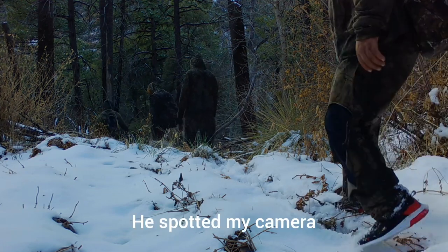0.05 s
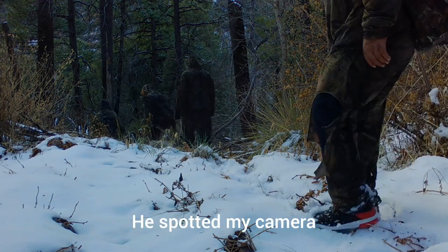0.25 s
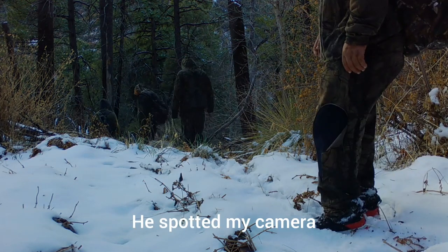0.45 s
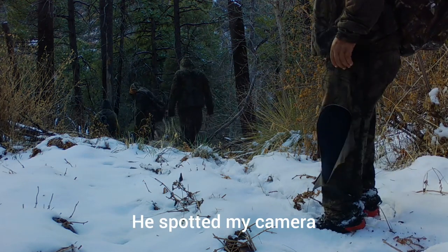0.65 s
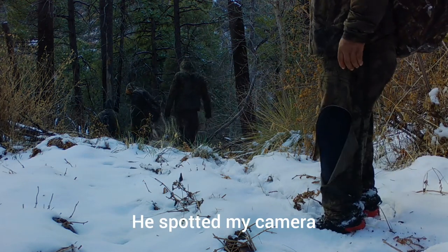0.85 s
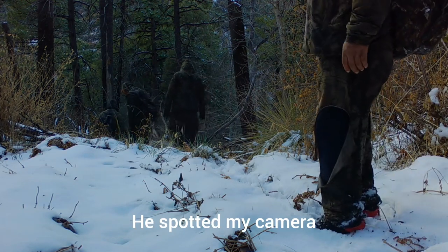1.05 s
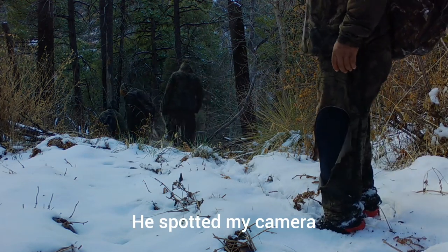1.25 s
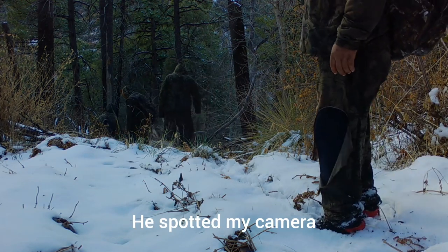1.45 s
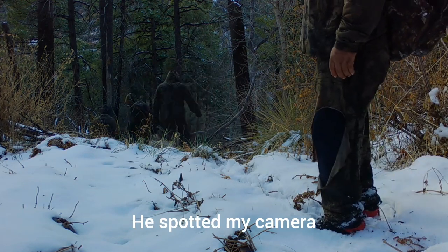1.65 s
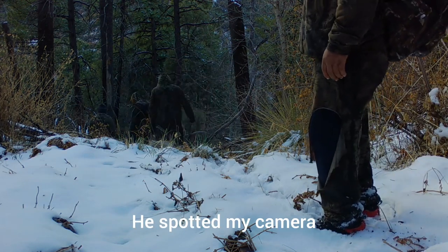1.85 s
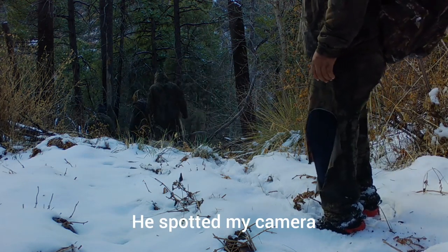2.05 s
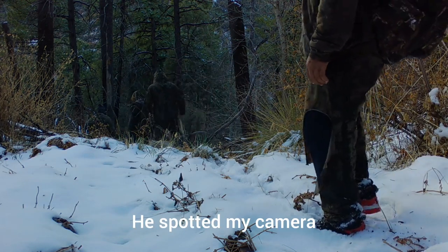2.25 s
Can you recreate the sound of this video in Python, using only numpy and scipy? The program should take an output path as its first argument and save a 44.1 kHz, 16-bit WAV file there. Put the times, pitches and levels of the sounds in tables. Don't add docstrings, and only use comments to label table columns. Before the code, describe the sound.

Boots crunch through crusty snow in a forest, a twig snaps sharply, then dry brush crackles

```python
import sys
import numpy as np
from scipy import signal
from scipy.io import wavfile
from scipy.ndimage import uniform_filter1d

SR = 44100
rng = np.random.default_rng(int(sys.argv[2]) if len(sys.argv) > 2 else 0)


def pcm_store(signal):
    levels = np.round(np.clip(np.atleast_2d(signal), -1, 1) * 32767)
    wavfile.write(sys.argv[1], SR, levels.astype(np.int16).T)


def how_loud(loudness_db):
    steps = np.asarray(loudness_db, float) / 20
    return 10 ** steps


N = 101429
T = np.arange(N) / SR

# start_s, level_db
WIND_GUSTS = [(0.0, -41), (0.03, -47.5), (0.13, -59), (0.17, -45.5), (0.34, -58), (0.37, -43),
              (0.63, -65.5), (0.78, -41), (0.84, -55), (0.9, -40.5), (0.97, -58.5), (1.29, -48.5),
              (1.43, -61.5), (1.8, -57.5), (1.82, -49), (2.0, -58.5), (2.07, -54.5), (2.3, -55.5)]
# pitch_hz, density_db (per Hz)
WIND_SPECTRUM = [(13, -37.5), (22, 1), (43, 0), (129, -21.5), (150, -36), (250, -26.5), (320, -70),
                 (550, -120)]
# start_s, level_db
FAR_STEPS = [(0, -56.5), (.1, -56), (.35, -51.5), (.55, -55), (.9, -52), (1.17, -54.5), (1.6, -52),
             (2.0, -51.5), (2.17, -53.5), (2.3, -57.5)]
# pitch_hz, density_db (per Hz)
WOODS_SPECTRUM = [(35, -29), (60, -2), (197, -5.5), (261, -14), (361, -8.5), (2620, -16), (6360, -8),
                  (14400, -28), (15800, -37)]
# pitch_hz, level_db, t60_s
TWIG_MODES = [(1050, -28, .006), (2400, -20, .004), (3200, -19, .004), (4300, -9, .003), (4900, -14, .017),
              (6120, 4, .0055), (7300, -7, .003), (8500, -4, .003), (10000, -9, .003), (12400, -12, .0025)]
# start_s, peak_db, pitch_hz
STALK_TICKS = [(.0058, -29, 6640), (0.0234, -33, 5900), (0.049, -34, 6700), (0.079, -38, 6300),
               (.175, -28, 6800), (.178, -28, 6500), (0.4997, -33, 6240), (0.8327, -31.5, 4100),
               (1.6243, -34, 6940), (1.7688, -36, 5500), (1.747, -37, 5800), (1.793, -26.5, 6000),
               (1.8395, -35, 8900), (1.877, -38, 6500), (1.983, -45, 3000), (0.923, -36, 6200),
               (1.044, -42, 5650), (1.1323, -40, 6300), (1.8971, -28, 6500), (1.9232, -34, 10700),
               (1.938, -42, 6200), (1.962, -42, 3300), (1.9941, -26.5, 3080), (2.079, -34, 6200),
               (1.9927, -35, 5860), (1.9947, -38, 4500), (2.007, -38, 8500), (2.052, -35, 8500),
               (1.817, -34, 11000), (2.047, -42, 2700), (2.1394, -51, 4000)]
# start_s, level_db
LEG_DRAG = [
    (1.17, -63),
    (1.212, -56),
    (1.316, -42.5),
    (1.434, -32),
    (1.658, -36.5),
    (1.78, -43.5),
    (1.88, -51.5),
    (1.964, -50.5),
    (1.974, -62),
    (2.03, -63),
]
# centre_s, lift_db, half_width_s
STALK_SURGES = [(1.409, 5, 0.0016), (1.417, 4.5, .0015), (1.438, 4, 0.0018), (1.439, -5, .001),
                (1.456, 1.5, 0.0036), (1.465, 2, .0015), (1.481, -2, .0015), (1.488, 3.5, .0015),
                (1.5, 3.5, 0.0037), (1.519, 0.5, 0.0023), (1.525, 8, 0.0031), (1.939, 7, .003),
                (1.534, 4.5, 0.0037), (1.625, 2.5, .006), (1.663, 1.5, 0.011), (1.72, 1.5, 0.0072),
                (1.956, 8, 0.0074)]
# pitch_hz, density_db (per Hz)
BRUSH_SPECTRUM = [(400, -23.5), (1200, -21.5), (2600, -18), (3400, -11.5), (5000, -7.5), (6100, -0.5),
                  (9500, -7), (15800, -20.5)]
# start_s, peak_db, pitch_hz
HEEL_THUDS = [
    (0.034, -58, 95),
    (0.178, -50, 154),
    (0.581, -46.5, 114),
    (0.723, -44.5, 191),
    (1.208, -48.5, 120),
    (1.416, -51, 160),
    (1.588, -46, 110),
    (2.023, -50, 134),
    (2.103, -40, 91),
]
# start_s, peak_db, pitch_hz, cycles_to_die
CRUST_KNOCKS = [(0.0407, -35.5, 850, 8.6), (0.185, -33.5, 560, 4.2), (0.2603, -40.5, 700, 3.7),
                (0.2595, -40.5, 1500, 4.5), (.41, -44, 500, 3.8), (.432, -43.5, 480, 4.3),
                (0.5, -45, 810, 6), (.513, -42, 620, 2.1), (.583, -46, 393, 6.3), (.727, -35.5, 756, 3.5),
                (.7284, -30, 674, 4.5), (.7298, -37, 513, 4.2), (0.728, -41, 1600, 10),
                (.7275, -46, 2140, 10), (0.922, -43, 1090, 16), (1.1139, -37, 790, 2.6),
                (1.131, -38, 1490, 2.6), (1.212, -35, 1800, 9.2), (1.538, -40, 1200, 15),
                (1.531, -44.5, 516, 10), (1.519, -43, 2100, 12), (1.559, -44, 1010, 18),
                (1.565, -44, 443, 3.7), (1.648, -44, 1290, 14), (1.66, -43, 1270, 19),
                (1.612, -36, 3500, 8), (1.6725, -36, 1150, 5.5), (1.674, -33, 2900, 7.6),
                (1.688, -26.5, 1180, 4.4), (1.687, -31, 3050, 7.9), (1.6892, -39, 774, 6.1),
                (1.705, -44, 2900, 7), (1.786, -41, 855, 5.2), (1.841, -39, 400, 9.7),
                (2.073, -40.5, 1140, 7.1), (2.0946, -36.5, 895, 5.6), (2.093, -44, 3000, 8),
                (2.099, -42, 1300, 5), (2.096, -43.5, 266, 5.2)]
# start_s, length_s, level_db, treble_db
SNOW_CRUNCHES = [(0.0, 0.0066, -52.5, -13), (0.035, 0.013, -45.5, -7.5), (0.066, .025, -70, 13),
                 (0.108, 0.071, -44.5, 0), (0.165, 0.072, -44.5, -3), (0.19, 0.053, -42.5, 5),
                 (0.251, 0.039, -47.5, -4), (0.285, 0.047, -44, -1), (0.355, 0.026, -51, 3),
                 (0.416, 0.0096, -46.5, 0), (0.493, 0.016, -49.5, 0), (0.559, 0.098, -50.5, -3),
                 (0.72, 0.097, -45, -2.5), (0.808, 0.098, -48.5, 11), (0.916, 0.0061, -45, -8),
                 (1.029, 0.026, -50, -6), (1.115, 0.021, -46, -5.5), (1.183, 0.11, -40, 0.5),
                 (1.533, 0.014, -47.5, -14.5), (1.574, 0.08, -43.5, -6.5), (1.703, 0.09, -43, 1),
                 (2.022, 0.074, -45.5, -0.5), (2.072, 0.096, -48.5, -4.5)]
# pitch_hz, density_db (per Hz)
SNOW_SPECTRUM = [(88, -42.5), (150, 2.5), (201, -10.5), (254, -8.5), (598, -6.5), (850, -8.5), (2430, -8.5),
                 (6320, 0), (15800, -23.5)]


def evened(x):
    return x / np.sqrt(np.mean(x ** 2) + 1e-20)


def curve(points):
    return how_loud(np.interp(T, *np.transpose(points)))


def coloured(x, points, lift_db=0):
    hz = abs(np.fft.fftfreq(8192, 1 / SR))
    f, db = np.transpose(points)
    log_f = np.log(np.r_[1, f, SR])
    db = np.interp(np.log(hz + 1), log_f, np.r_[db[0] - 30, db, db[-1] - 20])
    db = db + lift_db * (hz > 3000)
    spectrum = np.exp(np.conj(signal.hilbert(np.log(how_loud(db)))))
    taps = np.fft.ifft(spectrum).real[:4096]
    return signal.oaconvolve(x, taps / np.linalg.norm(taps))[:len(x)]


def add(mix, s, sound):
    part = mix[max(round(s * SR), 0):][:len(sound)]
    part += sound[:len(part)]


def grains(per_s, spread_db, hiss, clump_db, clump_s):
    size = how_loud(spread_db * np.minimum(rng.exponential(1, N), 5))
    cracks = size * (rng.random(N) < per_s / SR) * rng.choice([-1, 1], N)
    clumps = signal.lfilter([1], [1, -np.exp(-1 / (clump_s * SR))], rng.standard_normal(N))
    clumps = evened(uniform_filter1d(clumps, size=40))
    return evened((evened(cracks) + hiss * rng.standard_normal(N)) * how_loud(clump_db * clumps))


def patchy(x, depth_db):
    z = signal.stft(x, nperseg=128, noverlap=96)[2]
    patches = uniform_filter1d(rng.standard_normal(z.shape), size=5, axis=0)
    patches = evened(uniform_filter1d(patches, size=9, axis=1))
    return evened(signal.istft(z * how_loud(depth_db * patches), nperseg=128, noverlap=96)[1][:N])


def ring(hz, t60, rise_s):
    t = T[:SR // 5]
    x = (1 - np.exp(-t / rise_s)) * how_loud(-60 * t / t60) * np.sin(2 * np.pi * hz * t)
    return x / abs(x).max()


def wind():
    x = coloured(rng.standard_normal(N), WIND_SPECTRUM)
    swell = np.sqrt(abs(uniform_filter1d(x ** 2, size=5000)) + 1e-9)
    return how_loud(-1) * x / swell * curve(WIND_GUSTS)


def far_steps():
    return curve(FAR_STEPS) * coloured(grains(3000, 2.5, 1.5, 1.2, .01), WOODS_SPECTRUM)


def twig_snap():
    out = np.zeros(N)
    snap_s, snap_db = 0.207, -4
    modes = np.array([(-1) ** k * how_loud(db) * ring(hz, t60, .00005)
                      for k, (hz, db, t60) in enumerate(TWIG_MODES)])
    modes = modes / abs(modes.sum(0)).max()
    add(out, snap_s, how_loud(snap_db) * modes.sum(0))
    add(out, snap_s + 0.0008, how_loud(snap_db - 5) * modes[3:7].sum(0))
    splinters = coloured(rng.standard_normal(4000), BRUSH_SPECTRUM)
    add(out, snap_s + 0.0018, how_loud(snap_db - 30 - 60 * T[:4000] / 0.041) * splinters)
    return out


def stalk_ticks():
    out, t = np.zeros(N), T[:1000]
    t60_s, ring_share = 0.006, 0.55
    for s, db, hz in STALK_TICKS:
        crack = coloured(rng.standard_normal(1000) * how_loud(-60 * t / t60_s), BRUSH_SPECTRUM)
        crack = (hz / 6000) * crack / abs(crack).max()
        stalk = ring_share * ring(hz, 0.8 * t60_s, 0.00014)[:1000]
        add(out, s + 0.00083, how_loud(db) * (crack + stalk) * 0.66)
    return out


def brush():
    x = coloured(patchy(grains(12000, 2.1, 1.1, .3, .002), 1.0), BRUSH_SPECTRUM)
    treble = signal.sosfilt(signal.butter(2, 9000, "high", fs=SR, output="sos"), x)
    surge_db = sum(db * np.exp(-((T - s) / width) ** 2) for s, db, width in STALK_SURGES)
    gain = curve(LEG_DRAG) * how_loud(surge_db)
    brighter = (gain / gain.max()) ** 0.13 - 1
    contact = np.clip(np.minimum(T - LEG_DRAG[0][0], LEG_DRAG[-1][0] - T) / 0.014, 0, 1)
    return (x + treble * brighter) * gain * contact


def heel_thuds():
    out = np.zeros(N)
    for s, db, hz in HEEL_THUDS:
        add(out, s + 0.0049, how_loud(db) * ring(hz, 0.071, 0.003))
    return out


def crust_knocks():
    out = np.zeros(N)
    rise_cycles, burst_t60_s, burst_share = 0.61, 0.012, 0.2
    for s, db, hz, cycles in CRUST_KNOCKS:
        band = signal.butter(2, [.5 * hz, 1.8 * hz], "band", fs=SR, output="sos")
        puff = rng.standard_normal(1000) * how_loud(-60 * T[:1000] / burst_t60_s)
        rough = signal.sosfilt(band, puff)
        lump = ring(hz, cycles / hz, rise_cycles / hz)[:1000]
        add(out, s + 0.001334, how_loud(db) * (lump + burst_share * rough / abs(rough).max()))
    return out


def snow_crunches():
    raw, out = patchy(grains(7000, 2.2, 1.1, 1.2, .003), 2.26), np.zeros(N)
    rise_share, sag_db, release_s = 0.29, -3.5, 0.012
    for start, length, db, lift_db in SNOW_CRUNCHES:
        t = T[:round((length + .1) * SR)]
        rise = np.minimum(t / (rise_share * length), 1)
        hold = how_loud(db + sag_db * np.minimum(t / length, 1))
        release = np.exp(-np.maximum(t - length, 0) / release_s)
        shape = rise * hold * release
        piece = raw[round(start * SR):][:len(t)]
        add(out, start, coloured(piece, SNOW_SPECTRUM, lift_db) * shape[:len(piece)])
    return out


def scene():
    background = wind() + far_steps()
    plants = twig_snap() + stalk_ticks() + brush()
    boots = heel_thuds() + crust_knocks() + snow_crunches()
    return (background + plants + boots)[None]


def roll_off(x):
    return signal.sosfilt(signal.butter(12, 16600, fs=SR, output="sos"), x)


def record(dry):
    mic_hz, width_hz, edge_hz = 6000, 1200, 15900
    x = dry + 0.45 * signal.lfilter(*signal.iirpeak(mic_hz, mic_hz / width_hz, SR), dry)
    low_pass = signal.firwin(511, edge_hz, window=("kaiser", 9), fs=SR)
    x = signal.oaconvolve(x, low_pass[None], "same")
    return roll_off(x)


dry = scene()
out = record(dry)
pcm_store(out)
```